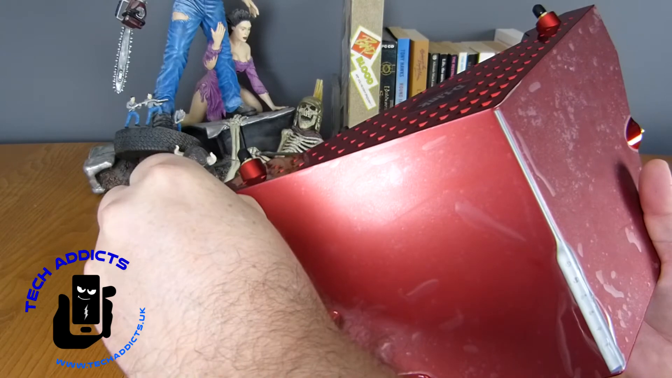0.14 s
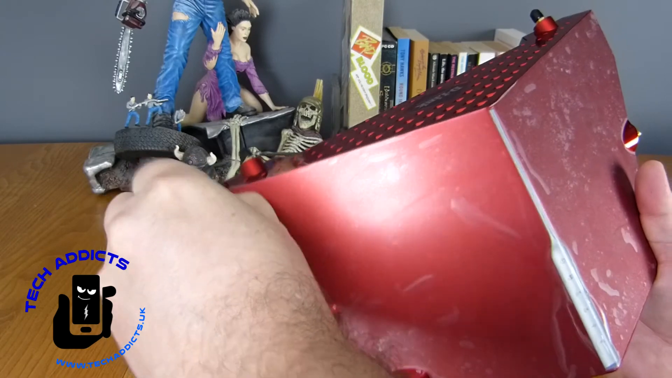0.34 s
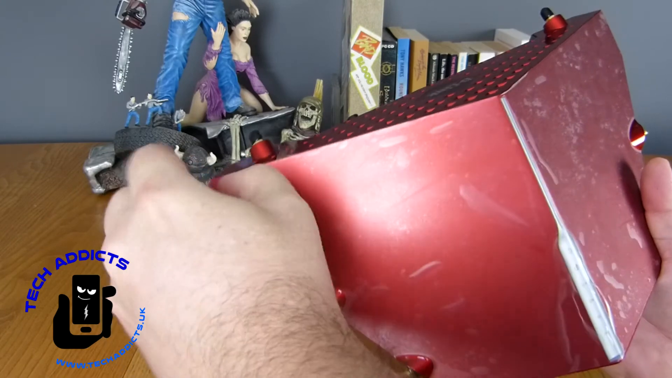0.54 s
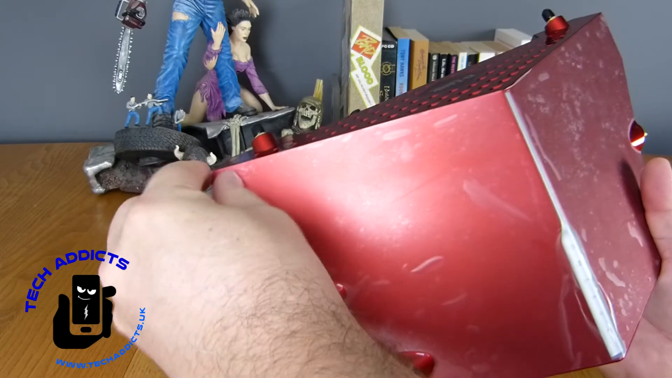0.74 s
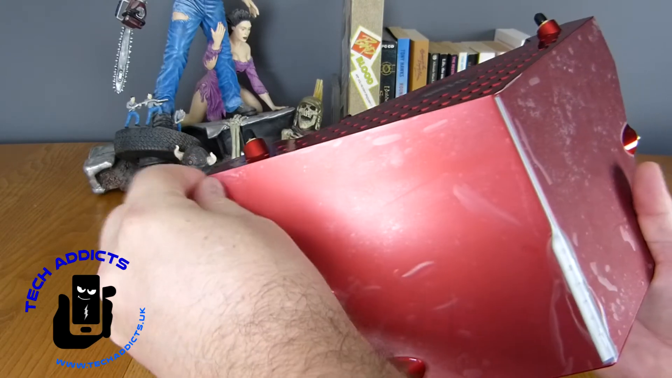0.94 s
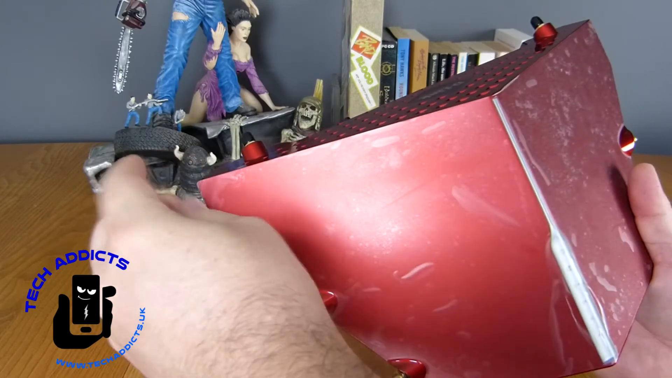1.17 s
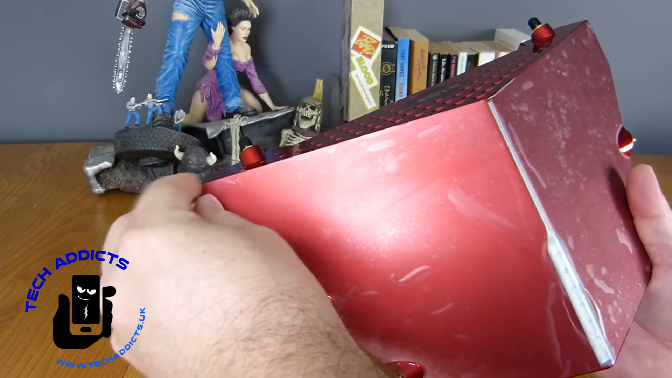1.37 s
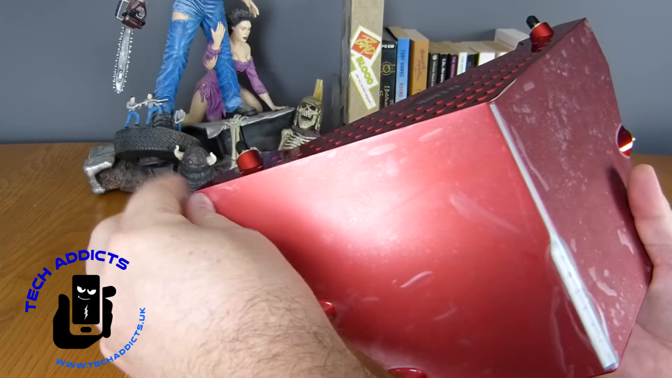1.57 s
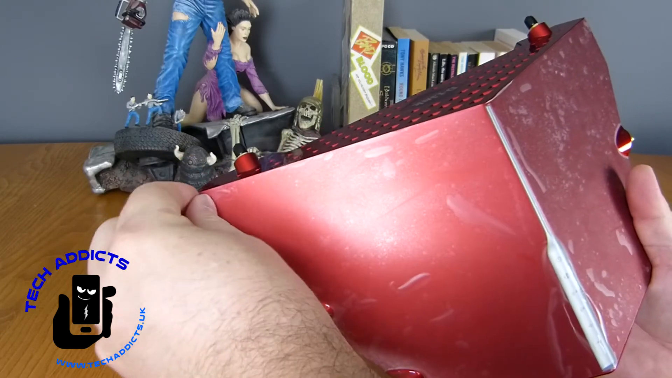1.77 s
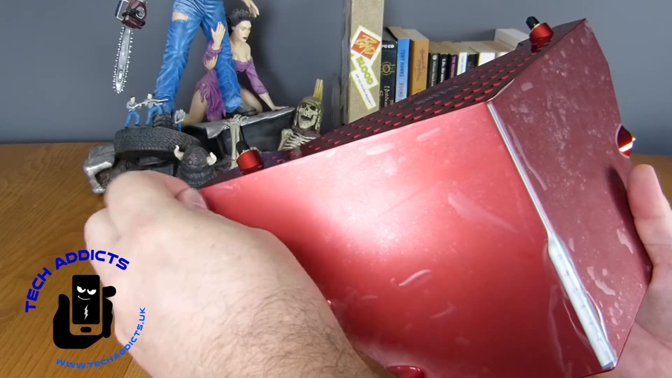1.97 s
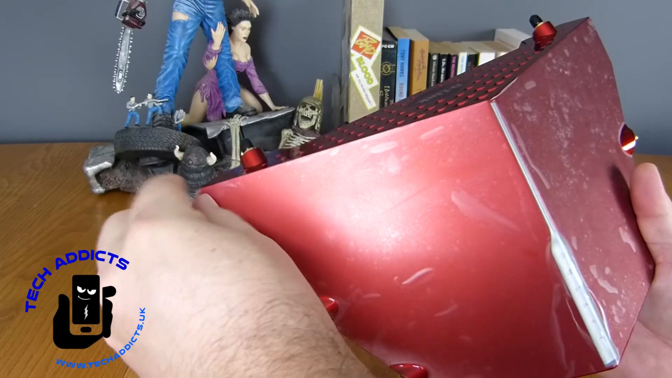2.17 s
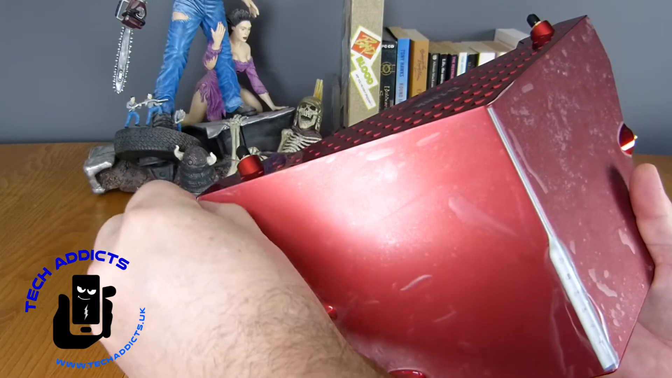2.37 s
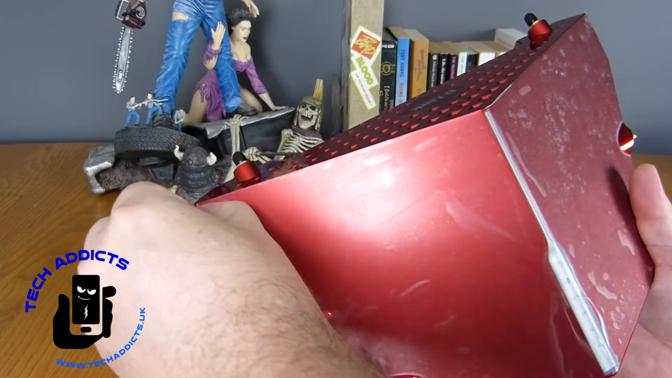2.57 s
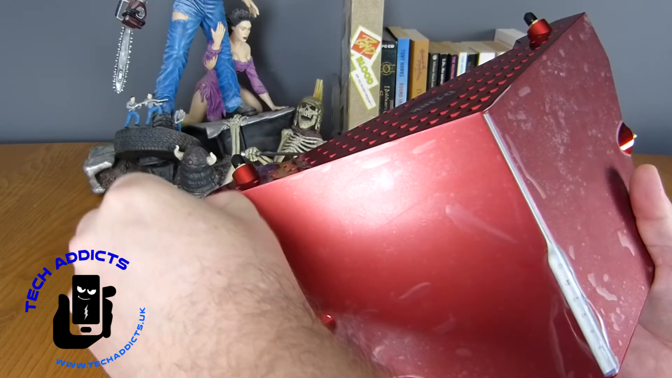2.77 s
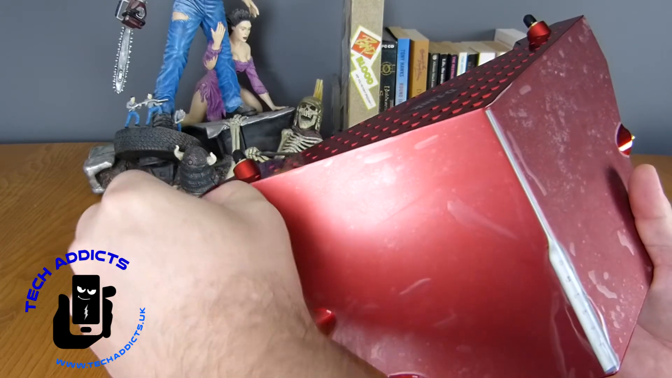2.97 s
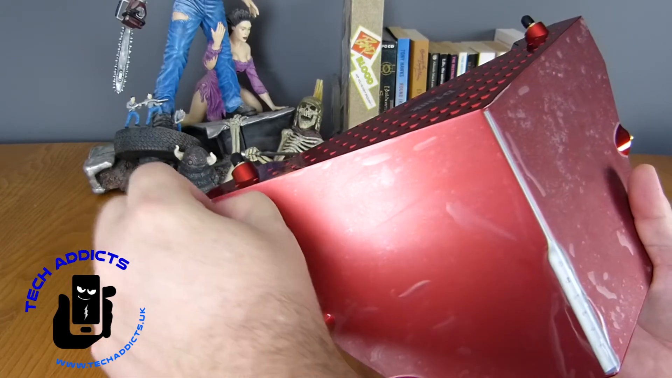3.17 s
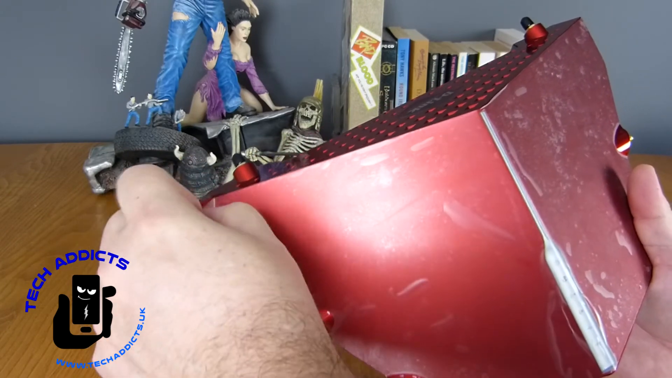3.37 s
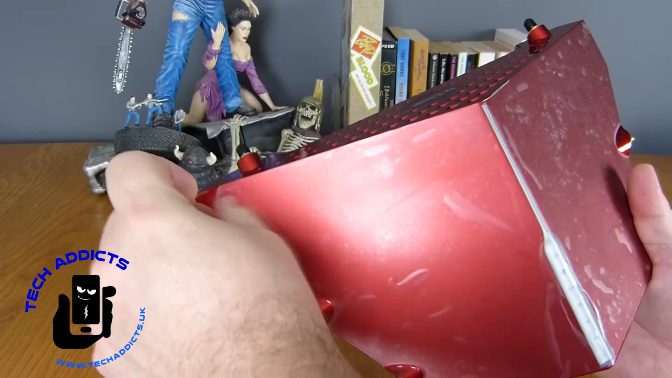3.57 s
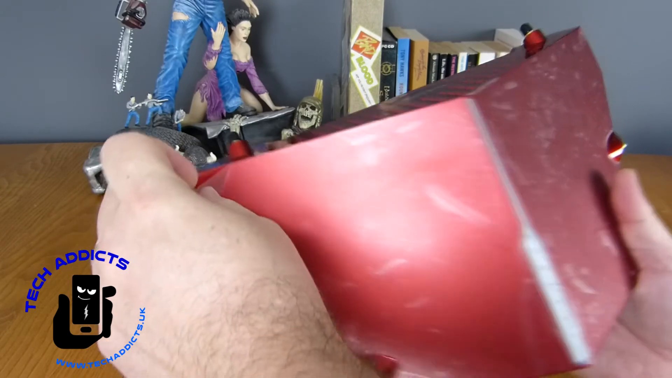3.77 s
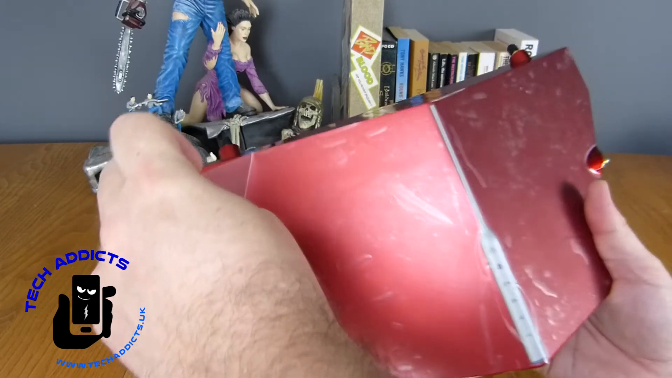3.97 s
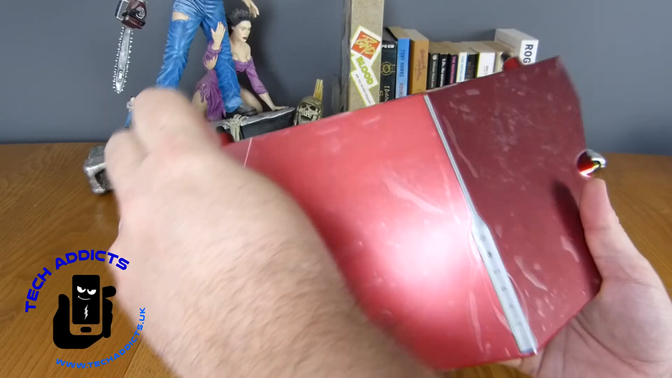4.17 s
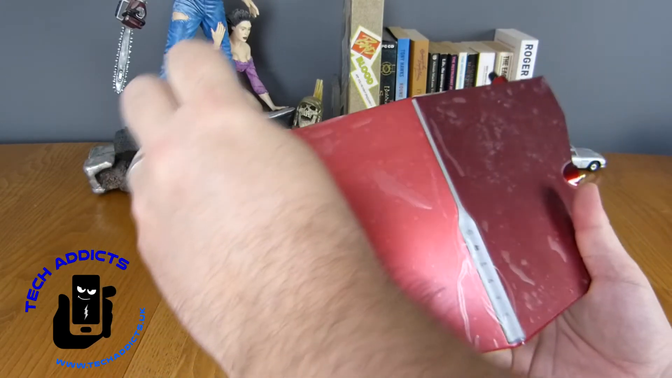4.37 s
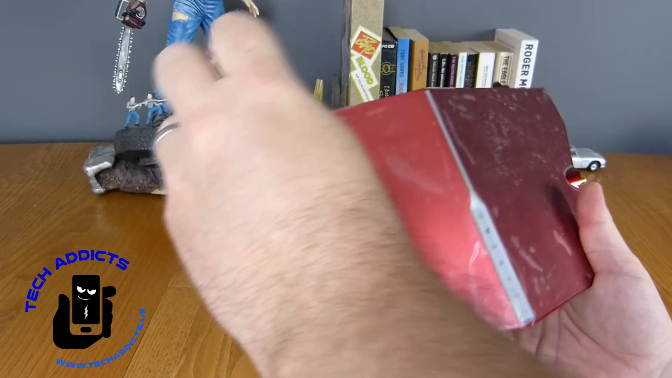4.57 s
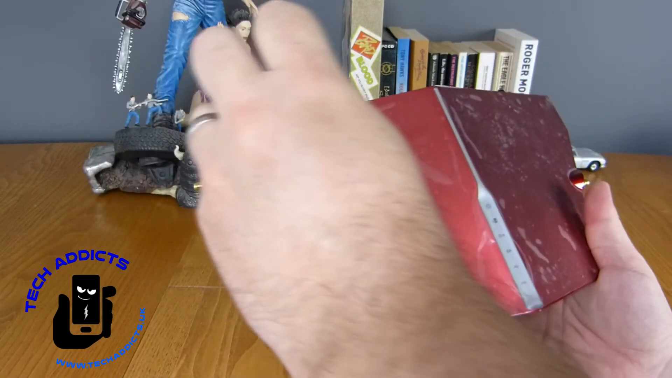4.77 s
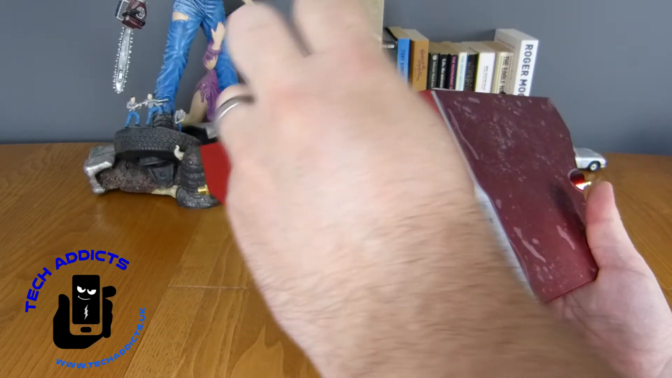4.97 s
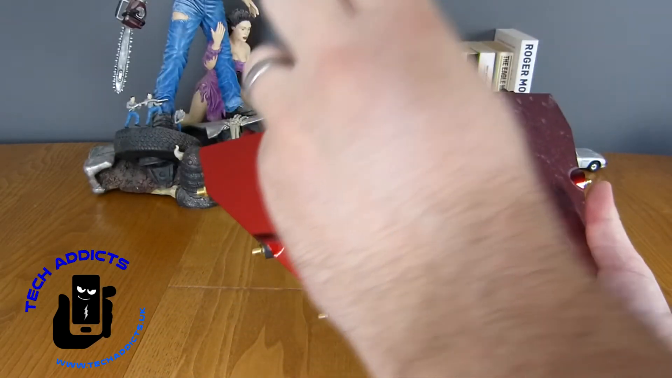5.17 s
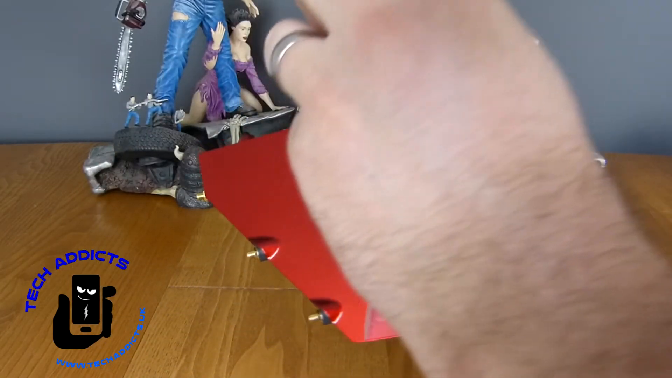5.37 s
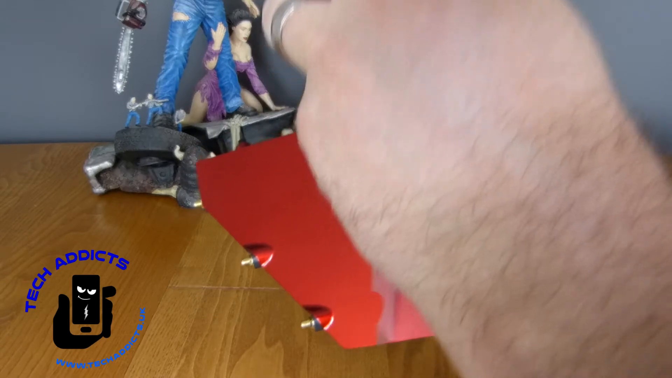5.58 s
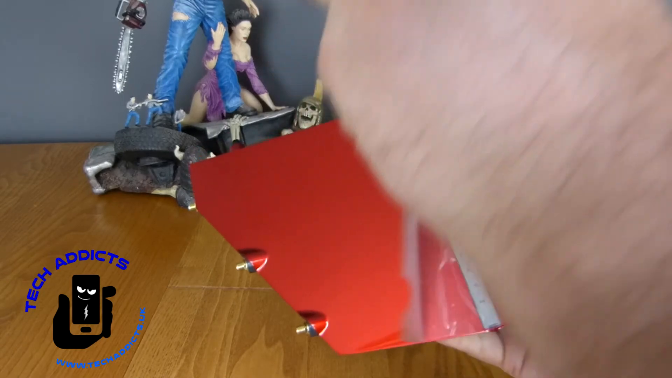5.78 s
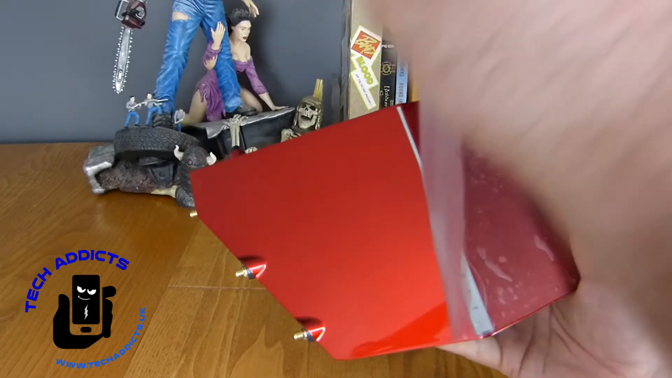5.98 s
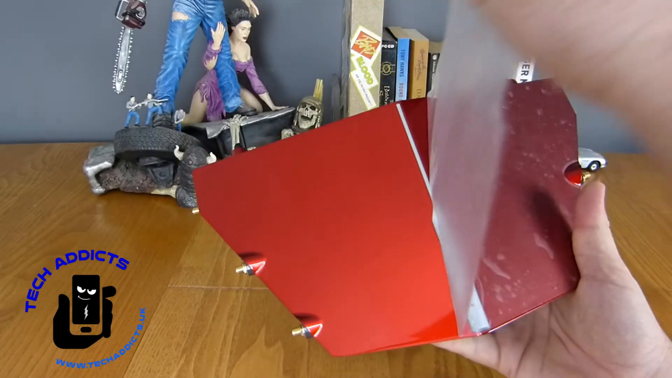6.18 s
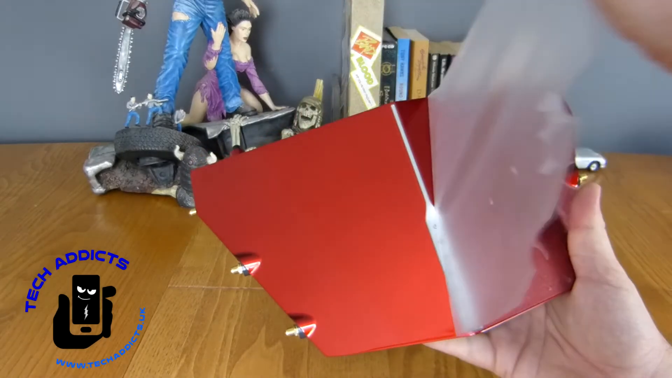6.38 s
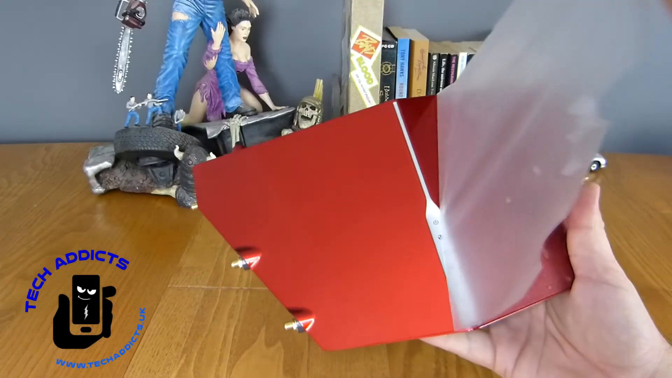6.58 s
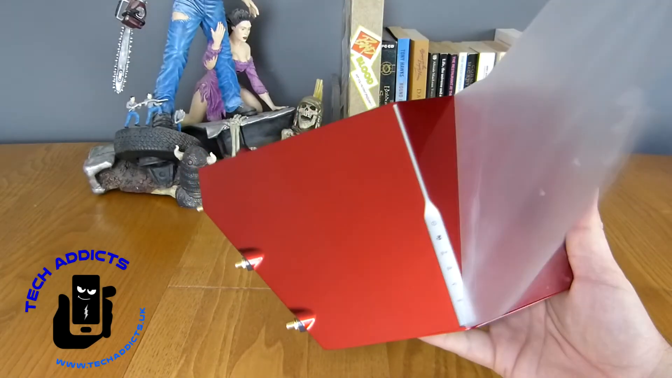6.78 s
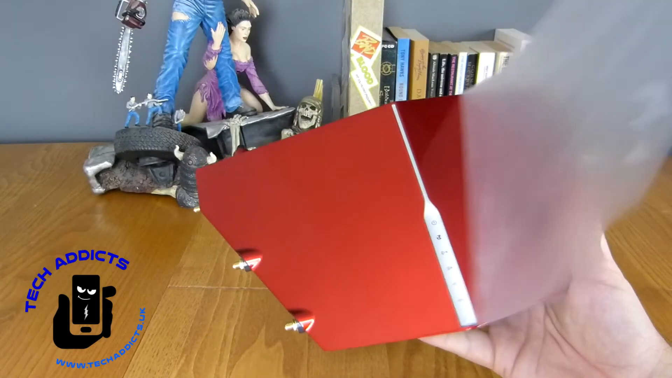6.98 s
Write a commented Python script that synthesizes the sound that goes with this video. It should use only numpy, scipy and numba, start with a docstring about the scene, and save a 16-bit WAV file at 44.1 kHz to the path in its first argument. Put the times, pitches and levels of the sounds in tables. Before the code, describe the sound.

Close to the microphone, fingernails pick at the edge of sticky plastic film on a hard case, making sparse ticks and short crackles. From about halfway, the film is tugged off in a series of louder, crisp rasps that faintly ring the case. After a few softer clicks, one last patch tears free. The small room adds a short echo and faint steady background noise.

```python
"""At a desk in a small room, protective film is picked loose from a hard plastic case and tugged off. The glue
lets go in countless tiny snaps: a crackle when slow, a rasp when fast, a burst when a stuck patch gives. The
snaps ring the taut film, the freed flap and the case. Fingernails tick on the edge and creases pop. Close
echoes, a short room tail, quiet room air and a low handling rumble reach a nearly mono microphone pair."""
import sys
import numpy as np
from scipy import signal
from scipy.fft import rfft, irfft, next_fast_len
from scipy.io import wavfile
from scipy.ndimage import map_coordinates
from numba import njit

SR = 44100
rng = np.random.default_rng(int(sys.argv[2]) if len(sys.argv) > 2 else 0)


def output_pcm(signal):
    """Save a mono or channel-first signal as 16-bit PCM at the path in sys.argv[1].

    Samples are clipped to [-1, 1] before scaling.
    """
    pcm = np.clip(np.atleast_2d(signal).T, -1, 1) * 32767
    wavfile.write(sys.argv[1], SR, np.round(pcm).astype(np.int16))


N = 309840
BAND_LIMIT_HZ = 15750


def amp(db):
    """Decibels to gain."""
    return 10 ** (np.asarray(db) / 20)


def unit_rms(x):
    """Scale to rms 1."""
    return x / np.sqrt(np.mean(x ** 2) + 1e-20)


def curve_at(points, hz):
    """Interpolate (freq_hz, value) points on a log frequency axis."""
    freqs_hz, values = np.transpose(points)
    return np.interp(np.log(hz + 1), np.log(freqs_hz), values)


def filtered(x, response):
    """Apply a gain given as a function of frequency."""
    size = next_fast_len(N + SR // 2)
    return irfft(rfft(x, size) * response(np.fft.rfftfreq(size, 1 / SR)), size)[..., :N]


def convolve(x, impulse):
    """Convolve with an impulse response scaled to energy 1."""
    return signal.fftconvolve(x, impulse / np.linalg.norm(impulse))[:N]


def noise(spectrum):
    """Steady shaped noise, rms 1."""
    return unit_rms(filtered(rng.standard_normal(N), lambda hz: amp(curve_at(spectrum, hz))))


def click(spectrum, size=2048):
    """Minimum-phase click with this spectrum."""
    cepstrum = irfft(np.log(amp(curve_at(spectrum, np.fft.rfftfreq(size, 1 / SR)))))
    cepstrum[1:size // 2] *= 2
    cepstrum[size // 2 + 1:] = 0
    return irfft(np.exp(rfft(cepstrum)))


def ring(modes, size=4096):
    """Impulse response of a body; modes alternate in sign."""
    hz = np.fft.rfftfreq(size, 1 / SR)
    return irfft(sum((-1) ** k * amp(db) * 1j * hz * width / (centre ** 2 - hz ** 2 + 1j * hz * width)
                     for k, (centre, width, db) in enumerate(modes)))


def wobble(rate_hz):
    """Smooth random curve."""
    knots = rng.standard_normal(int(N * rate_hz / SR) + 4)
    return map_coordinates(knots, [np.arange(N) * rate_hz / SR])


@njit
def resonator(x, pitch_hz, q):
    """Moving resonance that keeps the power of white noise."""
    out, state = np.zeros(len(x)), 0j
    for i in range(len(x)):
        step_rad = 2 * np.pi * pitch_hz[i] / SR
        decay = np.exp(-step_rad / (2 * q))
        state = state * decay * np.exp(1j * step_rad) + x[i] * np.sqrt(2 * (1 - decay * decay))
        out[i] = state.imag
    return out


def bursts(starts_s, levels_db, t60_s):
    """Showers of contacts: noise with a fast attack and a slower decay."""
    out, t = np.zeros(N + SR), np.arange(SR // 4) / SR
    attack = 1 - np.exp(-t / 0.00077)
    for start_s, level_db in zip(starts_s, levels_db):
        envelope = attack * amp(level_db - 60 * t / t60_s)
        out[round(start_s * SR):][:len(t)] += envelope * rng.standard_normal(len(t))
    return out[:N]


# freq_hz, relative_db
AIR_SPECTRUM = [(26, -5.5), (45, -10), (81, -1.5), (120, -5.5), (164, -4.5), (281, -6), (368, -8.5),
                (437, -10.5), (494, -10), (646, -13), (695, -13), (786, -15), (1110, -15), (2040, -22),
                (15500, -34.5)]
RUMBLE_SPECTRUM = [(8, -4.5), (18, -3), (27, 5), (42, 1), (70, -36), (200, -42)]

def background_noise():
    """Steady room air, and a low rumble from the hand holding the case that comes and goes."""
    air = amp(-57.33) * noise(AIR_SPECTRUM)
    rumble = amp(-64 + 2.8 * wobble(rate_hz=3)) * noise(RUMBLE_SPECTRUM)
    return air + rumble


# freq_hz, relative_db
HISS_SPECTRUM = [(60, -22), (400, -10), (1300, -13), (4400, -15.5), (8000, -18), (13000, -28), (15500, -63)]

def microphone_hiss():
    """Independent self-noise in each channel."""
    return amp(-77.5) * np.array([noise(HISS_SPECTRUM), noise(HISS_SPECTRUM)])


# One glue snap: freq_hz, relative_db
SNAP_SPECTRUM = [(100, -13), (500, -36.5), (1500, -11), (2500, -20.5), (4500, -4.5), (6000, 9), (7600, 7.5),
                 (10000, 6.5), (13500, 5), (16000, -2)]
# Taut film and case panel: pitch_hz, width_hz, relative_db
FILM_MODES = [(3070, 1250, -7.5), (3390, 130, 2.5), (3830, 340, -3), (4480, 650, 2.5), (5330, 2000, -2.5)]
CASE_MODES = [(287, 94, -2), (429, 62, 1), (713, 100, 0), (901, 110, 0), (1039, 114, 1.5), (1163, 175, 3),
              (1400, 440, 3), (1687, 390, 6), (2005, 1340, -3)]
# Film jerking free: start_s, level_db
JERK_EVENTS = [(0.4247, -22), (0.5437, -19.5), (3.0171, -22.5), (3.8676, -28), (3.8831, -15), (4.349, -28),
               (4.3704, -15.5), (4.7617, -12.5), (5.1907, -27), (5.9204, -19), (6.065, -13),
               (6.4276, -30.5), (6.6228, -29.5), (6.8651, -9.5), (6.8893, -9.5), (6.9164, -8.5)]

def jerks():
    """A stuck patch gives at once; the shower of snaps rings film and case."""
    shower = bursts(*np.transpose(JERK_EVENTS), t60_s=0.071)
    direct = amp(-17) * convolve(shower, click(SNAP_SPECTRUM))
    film = amp(-22.5) * convolve(shower, ring(FILM_MODES))
    case = amp(-30) * convolve(shower, ring(CASE_MODES))
    return direct + film + case


def tug_envelope_db(start_s, swell_s, hold_s, t60_s, level_db, onset_db, hold_change_db):
    """A tug gathers speed, levels off while the film runs, then dies away."""
    t = np.arange(N) / SR - start_s
    rise_db = onset_db * np.clip(1 - t / swell_s, 0, 1) ** 1.33
    run_db = hold_change_db * np.clip((t - swell_s) / hold_s, 0, 1)
    fall_db = -60 * np.maximum(t - swell_s - hold_s, 0) / t60_s
    return np.where(t < 0, -np.inf, level_db + rise_db + run_db + fall_db)


def glue_snaps(level_db, slow_per_s=1500, fast_per_s=22000, scatter_db=3.0, stick_slip_db=1.94):
    """Glue strands break at random, more often in a faster pull; rms 1."""
    speed = np.clip((level_db + 55) / 30, 0, 1)
    chance = slow_per_s * (fast_per_s / slow_per_s) ** speed / SR
    sizes = amp(scatter_db * rng.standard_normal(N)) * rng.choice([-1, 1], N)
    snaps = sizes * (rng.random(N) < chance) / np.sqrt(chance)
    return unit_rms(snaps * amp(stick_slip_db * wobble(rate_hz=300)))


# start_s, swell_s, hold_s, t60_s, level_db, onset_db, hold_change_db, film_db, case_db
TUGS = [(0.429, 0.013, 0.11, 0.12, -43, -4, -0.5, -0.5, -15.5),
        (0.534, 0.011, 0.0043, 0.12, -40, -5.5, -6, -1, -0.5),
        (1.067, 0.0091, 0.023, 0.12, -51, -9, -10, -11, -6.5),
        (3.001, 0.016, 0.019, 0.16, -42, -20, 1, -15, -30),
        (3.079, 0.028, 0.0114, 0.055, -44.5, -7, -0.5, 1, -2),
        (3.867, 0.12, 0.1, 0.094, -29, -13.5, -1, 1.5, -12.5),
        (4.323, 0.13, 0.073, 0.089, -28.5, -29, 0, 2, -10),
        (4.611, 0.09, 0.07, 0.4, -43.5, -19, 8, 2, -13.5),
        (4.76, 0.0034, 0.071, 0.32, -32, -1, -3.5, 1, -11), (4.95, 0.11, 0.045, 0.2, -33, -20, -2, -1, -13),
        (5.175, 0.012, 0.011, 0.25, -47, -7, -2.5, -1, -23),
        (5.243, 0.07, 0.079, 0.67, -34, -9, -2.5, -0.5, -12.5),
        (5.499, 0.12, 0.019, 0.46, -32.5, -10, -2.5, 3, -10.5),
        (5.736, 0.079, 0.09, 0.66, -38.5, -3, -3.5, 0, -13.5),
        (5.895, 0.044, 0.026, 0.13, -32.5, -8.5, -3.5, 0.5, -15),
        (6.004, 0.08, 0.13, 0.069, -30, -13, -7, 1.5, -12.5),
        (6.42, 0.051, 0.077, 0.18, -46.5, -19, -12, -3, -7.5),
        (6.61, 0.025, 0.011, 0.12, -50.5, -10, 3, -0.5, -9.5),
        (6.796, 0.025, 0.02, 0.15, -52.5, -11, -7, 1, -13),
        (6.843, 0.039, 0.066, 0.067, -30, -20.5, 1.5, 0.5, -9.5)]
# Bass limit of the freed sheet, higher when it is small: time_s, cutoff_hz
SHEET_CUTOFF = [(0.4, 960), (3.05, 1620), (3.9, 700), (4.4, 750), (4.8, 326), (5.8, 292), (6.05, 810),
                (6.9, 676)]

def peel():
    """Snaps sound directly and ring film, case and flap; the loudest tug sets the tone."""
    tug_levels_db = np.array([tug_envelope_db(*tug[:-2]) for tug in TUGS])
    crackle_db, loudest = tug_levels_db.max(axis=0), tug_levels_db.argmax(axis=0)
    crackle = amp(crackle_db) * glue_snaps(crackle_db)
    flap_ring = flap(crackle)
    out = np.zeros(N)
    for k, (start_s, _, _, _, level_db, _, _, film_db, case_db) in enumerate(TUGS):
        active = loudest == k
        snaps = active * crackle
        direct = amp(-2) * convolve(snaps, click(SNAP_SPECTRUM))
        detune = 1.021 + 0.012 * rng.standard_normal()  # no two tugs are equally taut
        film = amp(film_db - 6.5) * convolve(snaps, ring(np.array(FILM_MODES) * [detune, 1, 1]))
        strain = amp(0.16 * np.clip(crackle_db - level_db, -20, 20))  # harder pull, more case
        case = amp(case_db + 1.7) * convolve(snaps * strain, ring(CASE_MODES))
        cutoff_hz = np.interp(start_s, *np.transpose(SHEET_CUTOFF))
        highpass = signal.butter(2, cutoff_hz, "high", fs=SR)
        radiation = signal.lfilter(*highpass, signal.unit_impulse(1024))
        out += convolve(direct + film + case + active * flap_ring, radiation)
    return out


# start_s, length_s, first_hz, last_hz, gain_db
FLAP_GLIDES = [(0.438, 0.18, 7050, 1310, -4.5), (1.072, 0.065, 7500, 2000, -4.5),
               (3.02, 0.16, 9000, 1950, -9), (3.881, 0.215, 2170, 1120, -15.5)]

def flap(crackle, q=5.5, settle_s=0.0207, overtone_ratio=3.5):
    """The freed flap's main mode and overtone slide down as it grows."""
    pitch_hz, gain = np.full(N, 2000.), np.zeros(N)
    for start_s, length_s, first_hz, last_hz, gain_db in FLAP_GLIDES:
        t = np.arange(N) / SR - start_s
        active = (t >= 0) & (t < length_s)
        pitch_hz[active] = last_hz + (first_hz - last_hz) * np.exp(-t[active] / settle_s)
        gain[active] = amp(gain_db)
    drive = crackle * gain
    overtone_hz = np.minimum(overtone_ratio * pitch_hz, SR / 2)
    overtone = resonator(drive * (overtone_hz < BAND_LIMIT_HZ), overtone_hz, 2 * q)
    return resonator(drive, pitch_hz, q) + amp(-1) * overtone


# Nail on the edge and film buckling: freq_hz, relative_db
NAIL_SPECTRUM = [(200, -32), (1200, 5), (3000, 13), (4800, 15), (7000, 5), (16000, -30)]
CREASE_SPECTRUM = [(1000, -11), (4000, -9), (7000, 1.5), (11000, -1.5), (16000, -2.5)]
# Popped crease shivering: pitch_hz, width_hz, relative_db
SHIVER_MODES = [(7500, 1500, 0)]
# start_s, level_db, knock_db, crease_db, spot_hz
NAIL_SLIPS = [(0.9698, -30, -17.5, -20, 780), (2.01, -43.5, -20, -13, 1200),
              (3.212, -34.5, -17, -3.5, 1420), (3.304, -38.5, -8, -2, 1340), (3.5524, -42.5, -20, -6, 1400),
              (3.56, -34.5, -16, -11.5, 1400), (3.7068, -30.5, -11, -20.5, 266),
              (3.7705, -28, -27, -9.5, 1200), (4.3032, -47.5, -20, 2, 1200), (4.6295, -29, -27, -12, 1200),
              (5.1906, -23, -31, -9.5, 1200), (6.3051, -38, -19, -24, 1200), (6.3974, -49, -7, 2, 1200),
              (6.5452, -38.5, -14, 0, 1200), (6.7538, -26.5, -33, -9.5, 1200)]

def nail_ticks():
    """A nail slips off the edge: it ticks, knocks the case and pops a crease, which shivers on."""
    start_s, level_db, knock_db, crease_db, spot_hz = np.transpose(NAIL_SLIPS)
    tick = convolve(bursts(start_s, level_db + knock_db / 2, t60_s=0.033), click(NAIL_SPECTRUM))
    blows = bursts(start_s, level_db + knock_db, t60_s=0.039)
    case = convolve(blows, ring(CASE_MODES))
    latest = np.searchsorted(start_s, np.arange(N) / SR, side="right") - 1
    struck_spot = resonator(blows, spot_hz[latest], q=5.1)
    pop = convolve(bursts(start_s, level_db + crease_db, t60_s=0.044), click(CREASE_SPECTRUM))
    shiver = convolve(bursts(start_s, level_db + crease_db, t60_s=0.45), ring(SHIVER_MODES))
    knock = amp(-3.5) * case + amp(-2.5) * struck_spot
    return amp(-5.5) * tick + knock + amp(-4) * pop + amp(-27) * shiver


def close_echoes(x, span_s=0.011, count=18):
    """Add echoes off desk, hand and case; their paths drift as the peel line travels."""
    samples, out = np.arange(N), x.copy()
    for delay_s in np.linspace(span_s / 7, span_s, count):
        drifting_s = delay_s * np.exp(0.12 * wobble(rate_hz=5))
        echo = x[np.clip(samples - (drifting_s * SR).astype(int), 0, N - 1)]
        gain = 0.919 * np.exp(-delay_s / span_s) / np.sqrt(count)
        out += rng.choice([-1, 1]) * gain * echo
    return out


# freq_hz, t60_s
ROOM_DECAY = [(200, 0.61), (1000, 0.21), (4000, 0.2), (8000, 0.18), (15000, 0.19)]

def room_reverb(x, tail_db=-8, tail_count=5, switch_hz=12, build_s=0.017):
    """Add a short tail; its fine pattern keeps changing as the source moves."""
    tail_index = (np.arange(N) / SR * switch_hz).astype(int) % tail_count
    wet = np.zeros(N)
    for k in range(tail_count):
        hz, t, spectra = signal.stft(rng.standard_normal(SR // 2), SR, nperseg=256)
        decay = amp(-60 * t / curve_at(ROOM_DECAY, hz)[:, None])
        tail = signal.istft(spectra * decay, SR, nperseg=256)[1]
        tail *= np.clip(np.arange(len(tail)) / SR / build_s, 0, 1)
        wet += convolve(x * (tail_index == k), tail)
    return x + amp(tail_db) * wet


def scene():
    """Both microphones hear the same sound; only their hiss differs."""
    near = close_echoes(peel() + jerks() + nail_ticks())
    return room_reverb(near) + background_noise() + microphone_hiss()


def record(dry):
    """Brick-wall low-pass at the band limit."""
    return filtered(dry, lambda hz: hz < BAND_LIMIT_HZ)


dry = scene()
out = record(dry)
output_pcm(out)
```